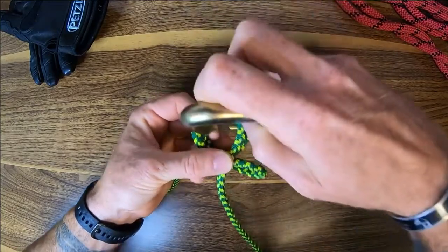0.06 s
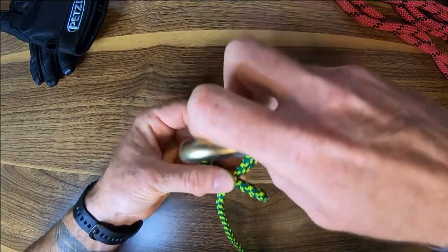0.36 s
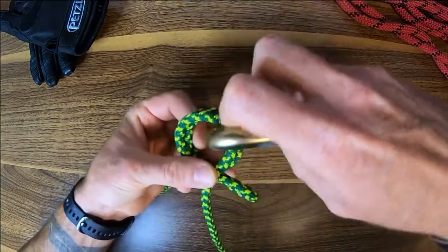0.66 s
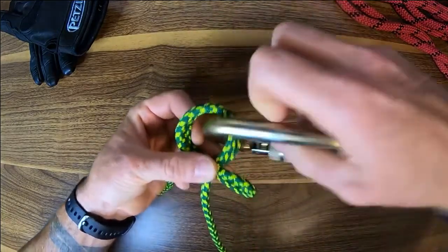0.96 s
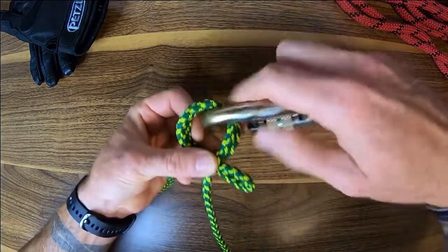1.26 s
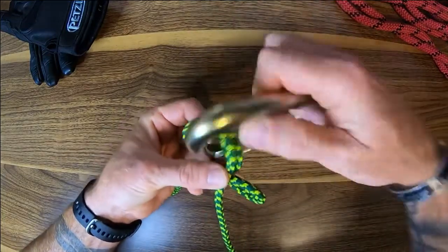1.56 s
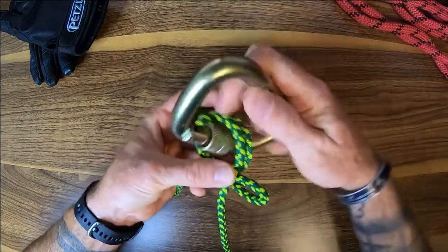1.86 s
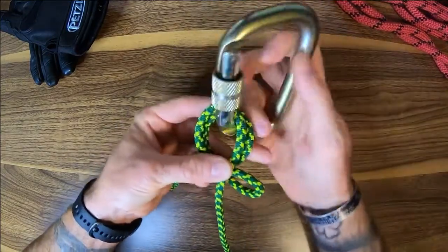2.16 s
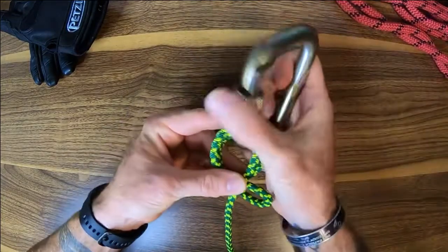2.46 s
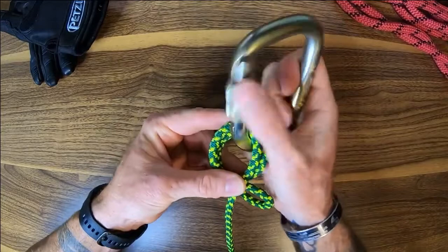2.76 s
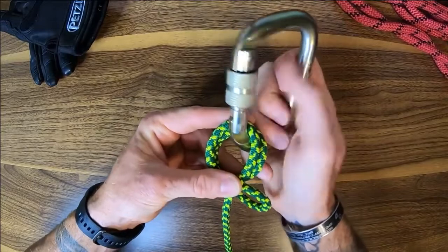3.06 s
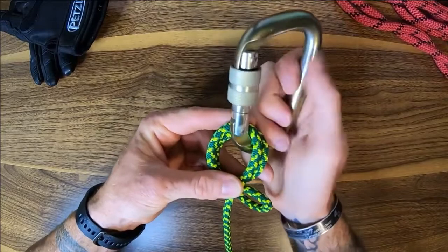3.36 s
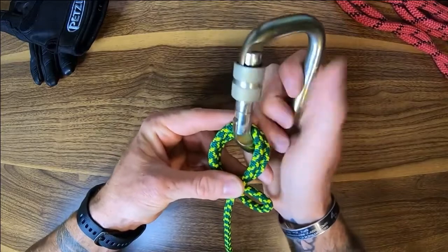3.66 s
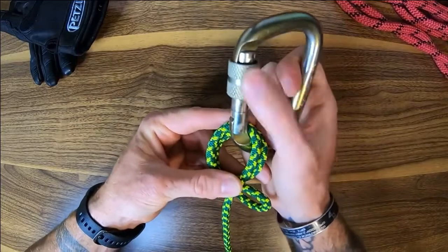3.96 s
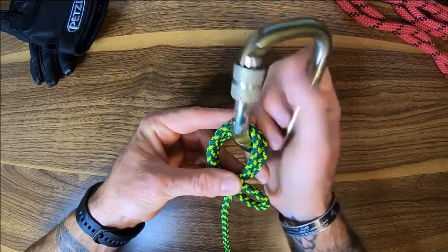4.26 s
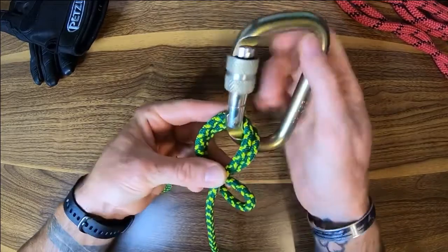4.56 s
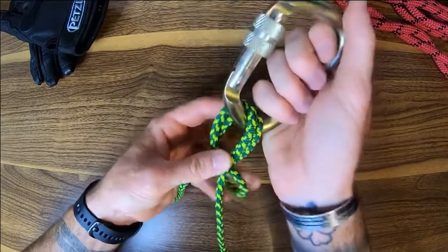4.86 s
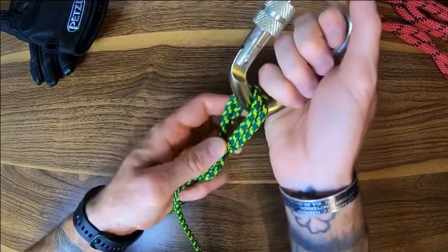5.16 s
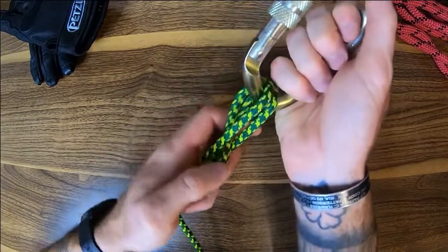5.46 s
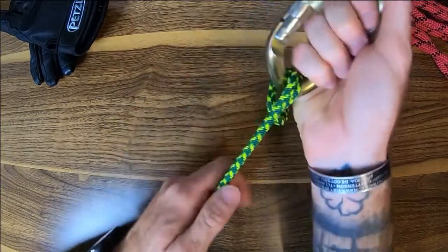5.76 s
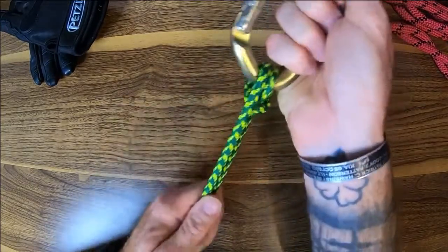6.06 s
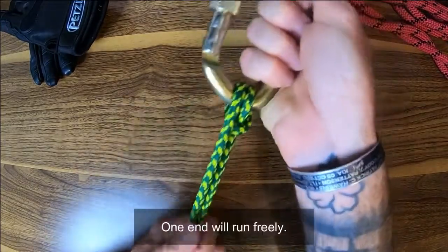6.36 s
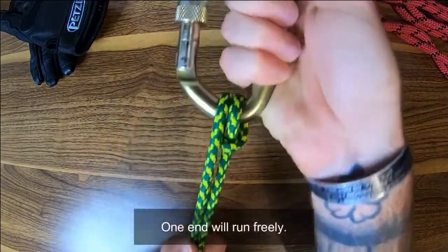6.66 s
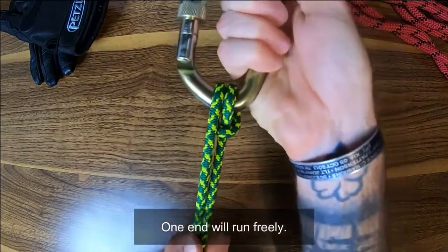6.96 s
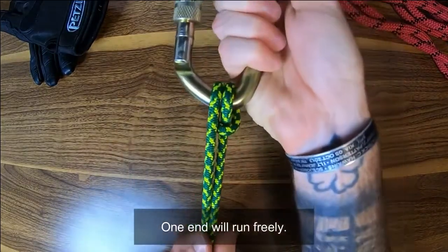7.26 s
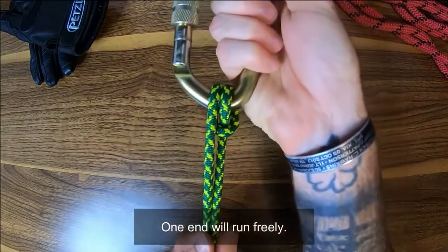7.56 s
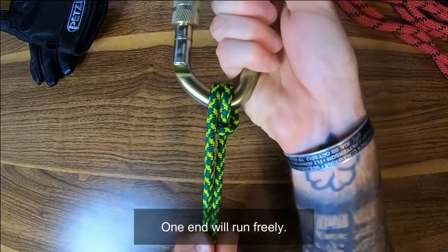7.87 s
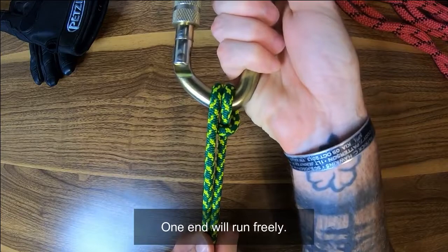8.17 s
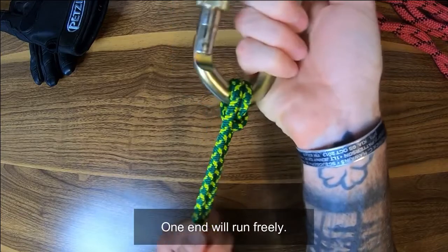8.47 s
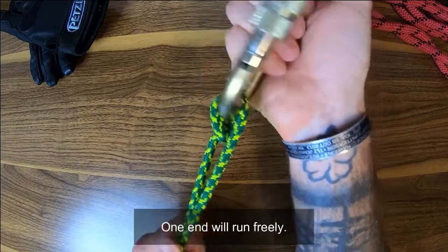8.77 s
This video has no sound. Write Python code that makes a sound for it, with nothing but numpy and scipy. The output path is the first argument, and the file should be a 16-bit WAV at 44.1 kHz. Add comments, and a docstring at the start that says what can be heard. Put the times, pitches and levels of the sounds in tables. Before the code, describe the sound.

In a small room with a steady rush of ventilation and a slowly pulsing low hum, a loud metallic snap rings out as a carabiner closes. Quieter rasping and clicking follows as the locking sleeve turns on its thread. Then cord is drawn tight against the steel, rustling and creaking softly, with light ticks and a few dull hand bumps. All the handling is heard up close.

```python
"""A sharp steel snap, a few rattling strokes, then rustling, creaking cord, in a small humming room.
A carabiner is clipped into a cord loop above a wooden table. Its sprung gate slams shut and rings,
ducking the automatic gain; a thumb screws the loose locking sleeve home, scraping and knocking on
the thread; the braid sticks and slips as it is drawn tight. Hands bump softly, ventilation rumbles
and a motor beats slowly against the mains hum."""
import sys
import numpy as np
from scipy import signal
from scipy.fft import rfft, irfft, next_fast_len
from scipy.io import wavfile
from scipy.ndimage import uniform_filter1d, minimum_filter1d

SR = 44100
rng = np.random.default_rng(int(sys.argv[2]) if len(sys.argv) > 2 else 0)


def inscribe(sig):
    """Save sig as 16-bit PCM at rate SR to the path in sys.argv[1].

    A 1-D sig is mono; a 2-D sig holds one channel per row.
    Samples are clipped to [-1, 1] before scaling.
    """
    pcm = np.round(np.clip(np.atleast_2d(sig).T, -1, 1) * 32767)
    wavfile.write(sys.argv[1], SR, pcm.astype(np.int16))


N = 392490
TIME = np.arange(N) / SR
SNAP_S = .9670   # the gate slams home

# colour of steel rubbing steel: f/Hz, relative level/dB
STEEL_RASP = [(600, -49), (1200, -10.5), (2000, -3), (2600, -0.5), (3600, 1), (4400, -4.5), (5300, 0),
              (7000, -1), (8700, -13.5), (10400, -17.5), (11500, -30), (14000, -26)]
# colour of sliding braid: f/Hz, relative level/dB
BRAID_HISS = [(120, 11.5), (280, 13), (600, 0.5), (1200, 1), (2500, 5.5), (4000, 2.5), (6000, -0.5),
              (7600, -2), (8500, -3), (10500, -13), (14000, -30)]


def gate(level_db=9, slam_db=3.5, crack_db=-16, crack_t60=0.064, clack_growth=0.36):
    """Steel hits steel: a dry clack, and a crack and bright ring that fill the room."""
    # gate and frame modes, the five that clack first: f/Hz, relative level/dB, t60/s, left over right/dB
    gate_modes = [(1470, -11.5, 0.0062, 2), (1870, -8, 0.0035, 3.5), (2863, 1.5, 0.0032, 1),
                  (3400, -2.5, 0.0058, 1.5), (3800, -1.5, 0.004, 1), (4868, -14, .007, 2),
                  (5170, -13, .008, 1.5), (7993, -2, 0.008, -10), (8700, -14.5, 0.0046, -6),
                  (10200, -20, .004, 5.5), (10900, -16.5, 0.004, 6.5)]
    # the closing gate grazes the nose, harder each time: t/s, relative level/dB
    grazes = [(.9254, -61), (.9458, -46.5), (0.9565, -31.5), (0.965, -23)]
    # colour of the crack: f/Hz, relative level/dB
    colour = [(900, -8.0), (1700, 4), (3200, 3), (6000, 5), (10500, -1.5), (14000, -4.0)]
    # faint chatter after the slam, ever sparser and softer: t/s, relative level/dB
    chatter = [(SNAP_S + .0024 * (k + 1) ** 1.2, -16 - 2 * k) for k in range(4)]
    t = TIME[:SR // 10]
    modes = [(-1) ** k * pan(left_db) * from_db(db - 60 * t / t60) * np.sin(2 * np.pi * hz * t)
             for k, (hz, db, t60, left_db) in enumerate(gate_modes)]
    clack, ring = sum(modes[:5]), sum(modes[5:])
    clacks, rings = np.zeros((2, 2, N))
    for s, db in grazes + [(SNAP_S, slam_db)] + chatter:
        crack = pan(left_db=4) * stereo_noise(colour, size=len(t)) * from_db(-60 * t / crack_t60)
        add(rings, s, from_db(db + level_db) * (ring + from_db(crack_db) * crack))
        # light touches ring more than they clack
        add(clacks, s, from_db(db + level_db + clack_growth * db) * clack)
    out = room(clacks, wet_db=-8.5, build_s=0.0043) + room(rings, wet_db=-2.5, build_s=0.007)
    # the snap's ring carries no deep bass
    return signal.sosfilt(signal.butter(2, 1300, "high", fs=SR, output="sos"), out + 1e-18)


def jolt(sway_db=-11, sway_hz=36, sway_t60=0.092, sway_delay_s=0.0051):
    """The snap jolts hand and frame: a short, low push and a slower sway."""
    # the push, left channel then right: delay/s, f/Hz, level/dB, t60/s
    pushes = [(.0038, 110, 5, .024), (.003, 170, 2, 0.019)]
    out, t = np.zeros((2, N)), TIME[:SR // 4]
    for channel, (delay_s, hz, db, t60) in zip(out, pushes):
        add(channel, SNAP_S + delay_s, from_db(db - 60 * t / t60) * np.sin(2 * np.pi * hz * t))
    sway = from_db(sway_db - 60 * t / sway_t60) * np.sin(2 * np.pi * sway_hz * t)
    add(out, SNAP_S + sway_delay_s, -pan(left_db=8) * sway)
    return out * [[-1], [1]]   # meets the two microphones with opposite signs


def sleeve(knock_db=-12.5, scrape_db=-3.5, sheen_db=6.5):
    """Knocks and fine scrapes of the thread set the locking sleeve and frame ringing."""
    # hardest knocks on the thread: t/s, relative level/dB, treble/dB, t60/s, favoured f/Hz
    knocks = [(2.567, -36, -12, .019, 3030), (2.582, -38, -9, .019, 3000), (2.6355, -42, -6, 0.047, 3190),
              (2.665, -32, 15, 0.018, 8420), (2.741, -32, 8, 0.015, 5200), (2.747, -26, 3, 0.015, 6340),
              (2.8448, -25.5, -4, .013, 2370), (3.0416, -20, 6.5, 0.016, 4430),
              (3.082, -35, -2.5, 0.017, 2930), (3.1115, -34, -2, .015, 5250),
              (3.1256, -32, 6.5, .019, 5230), (3.1363, -30, 8, 0.028, 6750),
              (3.1445, -31.5, 11, .016, 5100), (3.168, -35, 2, .022, 6720), (3.18, -35.5, 1, 0.022, 5190),
              (3.3202, -23, 6.5, 0.016, 5100), (3.3648, -25, 4.5, 0.027, 3560), (3.398, -40, 3, .05, 3400),
              (3.478, -38.5, 4, 0.032, 3190), (3.494, -42, 5, 0.017, 5300), (3.583, -53, -4, 0.024, 3200),
              (3.639, -35, 6, 0.052, 5200), (3.728, -41, -1, 0.018, 8500), (3.916, -32.5, 2.5, 0.066, 2610),
              (3.929, -28.5, -5, 0.021, 6800)]
    # thumb strokes: start/s, rise/s, length/s, relative level/dB, fade/dB, treble/dB, favoured f/Hz
    strokes = [(2.533, .046, 0.087, -41.5, 7, -16, 3000), (2.593, 0.041, 0.19, -43.5, 6, -5.5, 5900),
               (2.811, 0.018, 0.036, -39.5, 0, -7, 2600), (3.059, 0.05, .2, -39.5, 14, -3, 5030),
               (3.37, 0.011, .14, -43.5, 6.5, -0.5, 3840), (3.593, .04, .1, -36, 7.5, -7, 3680),
               (3.682, 0.028, .11, -43.5, 6.5, -25, 5300), (3.832, 0.022, .089, -40, -4, -8.5, 5370),
               (4.058, .019, 0.04, -57, -4.5, -3, 3000)]
    out, t = np.zeros((2, N)), TIME[:SR // 4]
    for s, db, treble_db, t60, hz in knocks:
        knock = contact(stereo_noise(STEEL_RASP, size=SR // 12), t60, treble_db)
        add(out, s, from_db(db + knock_db) * steel_ring(knock, hz))
    for s, rise_s, length_s, db, fade_db, treble_db, hz in strokes:
        pressure = thumb_pressure(t, rise_s, length_s, fade_db)
        roughness = stick_slip(per_s=450, spread_db=3.2, size=len(t))
        dull, bright = split_bands(roughness * stereo_noise(STEEL_RASP, size=len(t)))
        scrape = from_db(scrape_db) * pressure * (dull + from_db(treble_db) * bright)
        rattle = from_db(knock_db) * rattles(pressure, treble_db)
        add(out, s, from_db(db) * steel_ring(scrape + rattle, hz))
    left, right = pan(left_db=0.5) * out
    # the right microphone favours the top of the rasp
    sheen = from_db(sheen_db) * resonate(right, hz=8530, width_hz=370)
    return np.array([left, right + sheen])


def thumb_pressure(t, rise_s, length_s, fade_db, release_s=0.011):
    """The thumb bears on, eases off as it rolls (a negative fade presses harder) and lets go."""
    bearing_on = np.clip(t / rise_s, 0, 1) ** 2
    easing = from_db(-fade_db * np.clip((t - rise_s) / (length_s - rise_s), 0, 1))
    letting_go = np.clip((length_s - t) / release_s, 0, 1)
    return bearing_on * easing * letting_go


def rattles(pressure, treble_db, per_s=70, relative_db=-4.5, spread_db=4.5, t60=0.015):
    """The loose sleeve rattles as it turns: small random knocks that follow the thumb's pressure."""
    out = np.zeros((2, N))
    for k, (jitter, strength) in enumerate(rng.standard_normal((14, 2))):
        s = (k + .5 + .5 * np.tanh(jitter)) / per_s
        knock = contact(stereo_noise(STEEL_RASP, size=SR // 25), t60, treble_db)
        force = np.interp(s, TIME[:len(pressure)], pressure)
        add(out, s, force * from_db(relative_db + spread_db * strength) * knock)
    return out[:, :len(pressure)]


def steel_ring(drive, favoured_hz, favour_db=1, grip_db=4.5, retune=0.0091, ring_db=0.5, rasp_db=-5.0):
    """Sleeve and frame ring; each new grip favours one pitch and nudges the modes' tuning and level."""
    # modes of the sleeve on the frame: f/Hz, width/Hz, relative level/dB
    modes = [(2590, 50, 0), (3000, 70, -1), (3280, 50, -3), (3580, 150, -1), (3710, 150, 2),
             (4640, 160, -10), (5230, 170, .5), (5450, 110, -3), (5750, 45, 0), (5980, 110, -1),
             (6350, 160, -4), (6720, 110, 0), (7200, 80, -5), (7680, 130, -6), (8600, 300, -4),
             (9200, 260, -3), (9950, 400, 0)]
    drive = drive + from_db(favour_db) * resonate(drive, favoured_hz, width_hz=390)
    grips = rng.standard_normal((len(modes), 2))
    ringing = sum(from_db(db + grip_db * freedom) * resonate(drive, hz * (1 + retune * shift), width)
                  for (hz, width, db), (freedom, shift) in zip(modes, grips))
    return from_db(rasp_db) * drive + from_db(ring_db) * ringing


def cord_rustle(pull_db=6.0, rub_db=3):
    """The braid hisses, louder the faster it slides, grainy as its fibres catch."""
    # hiss as the cord is dressed, then pulled tight: t/s, relative level/dB
    pull_curve = [(4.33, -80), (4.37, -85), (4.4, -71), (4.62, -77.5), (4.73, -70.5), (5.18, -80),
                  (5.24, -95), (5.28, -74), (5.32, -84.5), (5.665, -72.5), (5.7, -64.5), (5.78, -62.5),
                  (5.9, -69.5), (5.99, -63), (6.06, -66), (6.14, -73.5), (6.69, -66), (6.8, -83.5),
                  (7.06, -72), (7.2, -103)]
    # brief rubs between the fingers: centre/s, relative level/dB, half length/s
    rubs = [(.66, -67.5, 0.042), (1.7, -63, 0.015), (2.27, -68.5, 0.05), (8.2, -72, 0.023),
            (8.46, -75, 0.028), (8.8, -76, 0.18)]
    times, levels = np.transpose(pull_curve)
    pulling = from_db(pull_db + np.interp(TIME, times, levels, left=-np.inf, right=-np.inf))
    rubbing = from_db(rub_db) * sum(from_db(db) * swell(s, half_s) for s, db, half_s in rubs)
    fibres = stick_slip(per_s=350, spread_db=2.1)
    return (pulling + rubbing) * fibres * stereo_noise(BRAID_HISS)


def cord_creaks():
    """The loaded braid slips on the steel in small jerks that make the taut cord resonate."""
    # creaks: centre/s, level/dB, half length/s, f/Hz, width/Hz
    creaks = [(.652, -64, .043, 3030, 1100), (2.35, -68, .04, 2720, 160), (2.38, -67, .07, 3130, 300),
              (2.5, -67, .06, 2900, 1100), (5.837, -69, .1, 3100, 1600), (6.3, -69.5, .14, 2600, 1200),
              (6.583, -69, .1, 3500, 1500), (7.68, -76, .1, 3750, 600), (8.46, -68.5, .038, 3300, 700),
              (8.65, -72, .04, 3400, 600), (8.77, -64, .035, 2450, 450)]
    jerks = stick_slip(per_s=200, spread_db=3.6) * stereo_noise(BRAID_HISS)
    return sum(from_db(db) * swell(s, half_s) * rms_one(band(jerks, hz, width))
               for s, db, half_s, hz, width in creaks)


def cord_ticks(level_db=-13.0, t60=0.024):
    """Cord and fingers tick lightly on the frame, and the loaded braid slips on it in single clicks."""
    # touches and single slips of the braid: t/s, relative level/dB, treble/dB
    ticks = [(0.529, -51, 1.5), (1.6811, -52, 6), (1.8387, -54, 4), (2.3084, -52.5, 6), (4.291, -49, -1),
             (6.355, -50, -2), (6.5018, -46, 0), (6.677, -46, 9), (7.5012, -54, -5), (7.6065, -50, -10),
             (7.643, -49, -10), (7.6764, -52, -11.5), (7.703, -52, -10), (8.1225, -50.5, -4),
             (8.172, -51.5, 2), (8.413, -42.5, -9), (8.48, -56.5, 1), (8.631, -52.5, -11.5),
             (8.7483, -53, -14.5)]
    # colour of a tick: f/Hz, relative level/dB
    colour = [(1000, 1), (2200, -5), (3200, 1.5), (4000, -4), (4800, -12.5), (8000, -11), (11000, -28),
              (14000, -44)]
    out = np.zeros((2, N))
    for s, db, treble_db in ticks:
        tick = contact(stereo_noise(colour, size=SR // 20), t60, treble_db)
        add(out, s, from_db(db + level_db) * tick)
    return out


def hand_bumps(width_share=0.33):
    """Soft, dull knocks of the hands: short swells of low noise."""
    # bumps: centre/s, level/dB, half length/s, f/Hz
    bumps = [(2.552, -41, 0.038, 57), (3.402, -48, 0.057, 131.4), (4.48, -39, 0.021, 141),
             (6.215, -47, .12, 142.6), (6.894, -43.5, 0.043, 133.6), (6.896, -40, 0.049, 57.3),
             (7.312, -50, .031, 35.95), (7.458, -54, 0.03, 36)]
    noise, out = rng.standard_normal(N), 0
    for s, db, half_s, hz in bumps:
        shape = swell(s, half_s)
        rumble = shape * band(noise, hz, hz * width_share)
        out = out + from_db(db) * rms_one(rumble) * np.sqrt(np.mean(shape ** 2))
    return out


def ventilation(air_db=-49.5):
    """Moving air: a broad wash, droning room resonances and a rumble around the hum."""
    # colour of the air: f/Hz, relative level/dB
    colour = [(20, -16), (45, -18), (80, -9), (100, -8), (135, 2.5), (220, -1), (330, -6), (500, -9),
              (680, -9.5), (860, -14.5), (980, -15.5), (1400, -19), (2000, -24.5), (5000, -41.5),
              (9000, -49.5), (13000, -66.5)]
    # room resonances, then the rumble: f/Hz, width/Hz, rms level/dB
    drones = [(119.1, 7.5, -55), (132.8, 4.2, -54.5), (143.2, 14, -54), (203.9, 42, -56.5),
              (294.5, 8.8, -64.5), (368.8, 15, -63.5), (513, 15, -80.5), (632, 91, -60), (689, 9.8, -68),
              (743.8, 23, -66), (856.2, 49, -66)]
    rumble = (62.73, 84, -62)
    out = from_db(air_db) * stereo_noise(colour)
    for hz, width, db in drones + [rumble]:
        out = out + from_db(db) * rms_one(band(rng.standard_normal(N), hz, width))
    return out


def hum(crest_s=.81):
    """A motor running just under mains frequency beats slowly with the mains hum."""
    # motor, then mains: f/Hz, rms level/dB
    tones = [(58.83, -53.5), (59.98, -56.5)]
    return sum(np.sqrt(2) * from_db(db) * np.cos(2 * np.pi * hz * (TIME - crest_s)) for hz, db in tones)


def room(x, wet_db, build_s=0.0021, dull_t60=.33, bright_t60=.26):
    """Diffuse reflections build up quickly and die away, the treble first."""
    # colour of the reflections: f/Hz, relative level/dB
    colour = [(150, -7.0), (1000, -6.5), (1800, -4.5), (3400, -5), (5000, -2), (8000, 1.0),
              (10700, 3.5), (14000, 2)]
    t = TIME[:SR // 2]
    dull, bright = split_bands(stereo_noise(colour, size=len(t)))
    tail = dull * from_db(-60 * t / dull_t60) + bright * from_db(-60 * t / bright_t60)
    build_up = 1 - np.exp(-(t / build_s) ** 2)
    tail = rms_one(tail * build_up) / np.sqrt(len(t))
    return x + from_db(wet_db) * signal.oaconvolve(x.mean(axis=0)[None], tail, axes=1)[:, :N]


def contact(noise, t60, treble_db, rise_s=0.001, edge_hz=4400):
    """One contact: a tiny burst of chatter, brighter for a harder hit."""
    t = TIME[:noise.shape[1]]
    dull = signal.sosfiltfilt(signal.butter(3, edge_hz, fs=SR, output="sos"), noise)
    chatter = dull + (noise - dull) * from_db(treble_db)
    envelope = (1 - np.exp(-(t / rise_s) ** 2)) * from_db(-60 * t / t60)
    return rms_one(chatter * envelope) * np.sqrt(t60 / t[-1])


def stick_slip(per_s, spread_db, size=N):
    """Uneven friction: a gain that jumps about at a given rate."""
    steps = rng.standard_normal(size)
    wander = np.interp(TIME[:size] * per_s, np.arange(size), steps)
    return rms_one(from_db(spread_db * np.clip(wander, -2, 2)))


def stereo_noise(colour, size=N):
    """Diffuse coloured noise, most alike in both channels in the bass; rms 1."""
    # likeness of left and right: f/Hz, correlation
    likeness = [(60, 0.47), (130, 0.99), (280, 0.93), (620, 0.55), (1350, 0), (2950, 0.72), (6400, 0.24),
                (14000, 0.0076)]
    padded = next_fast_len(size, True)
    hz = np.maximum(np.fft.rfftfreq(padded, 1 / SR), 1)
    mid, side = rfft(rng.standard_normal((2, padded)))
    alike = np.clip(at_hz(likeness, hz), -1, 1)
    both = np.sqrt(1 + alike) * mid + np.sqrt(1 - alike) * side * [[1], [-1]]
    return rms_one(irfft(both * from_db(at_hz(colour, hz)), padded)[:, :size])


def resonate(x, hz, width_hz):
    """A resonance with gain 1 at its peak."""
    r = np.exp(-np.pi * width_hz / SR)
    feedback = [1, -2 * r * np.cos(2 * np.pi * hz / SR), r * r]
    return signal.lfilter(np.array([1, 0, -1]) * (1 - r * r) / 2, feedback, x + 1e-18)


def band(x, hz, width_hz):
    """The same resonance twice over, for steeper skirts."""
    return resonate(resonate(x, hz, width_hz), hz, width_hz)


def split_bands(x, edge_hz=3300):
    """The dull and the bright part of a sound."""
    dull = signal.sosfilt(signal.butter(1, edge_hz, fs=SR, output="sos"), x)
    return dull, x - dull


def swell(s, half_s):
    """A bell-shaped rise and fall."""
    out = np.zeros(N)
    near = slice(*np.searchsorted(TIME, [s - 10 * half_s, s + 10 * half_s]))
    out[near] = np.exp(-.5 * ((TIME[near] - s) / half_s) ** 2)
    return out


def from_db(db):
    """Decibels to gain."""
    return 10 ** (np.asarray(db) / 20)


def rms_one(x):
    """Scale to rms 1."""
    return x / np.sqrt(np.mean(x ** 2) + 1e-20)


def at_hz(points, hz):
    """Read a curve along log frequency."""
    freqs, values = np.transpose(points)
    return np.interp(np.log(hz), np.log(freqs), values)


def pan(left_db):
    """Channel gains that put the left this far above the right."""
    return from_db(np.array([[left_db], [-left_db]]) / 2)


def add(out, s, sound):
    """Mix a sound in at s seconds."""
    at = int(round(s * SR))
    out[..., at:at + sound.shape[-1]] += sound[..., :N - at]


def release(over_db, db_per_s):
    """Gain reduction that is let go at a steady rate."""
    return np.maximum.accumulate(over_db + db_per_s * TIME) - db_per_s * TIME


def scene(lean_db=-15):
    """Hardware and cord up close, their upper treble leaning right; the room behind."""
    hardware = gate() + room(sleeve(), wet_db=-6.0)
    cord = room(cord_rustle() + cord_creaks() + cord_ticks(), wet_db=-1.0)
    near = hardware + cord
    lean = from_db(lean_db) * resonate(near, hz=7200, width_hz=5100) * [[-1], [1]]
    return near + lean + jolt() + hand_bumps() + ventilation() + hum()


def record(dry, threshold_db=-4.0, slow_share=0.31, attack_s=0.0032, cutoff_hz=13900):
    """The gain ducks on a loud peak and recovers fast, then slowly; a limiter and a high cut follow."""
    peak_db = 20 * np.log10(np.abs(dry).max(axis=0) + 1e-9)
    over_db = np.maximum(peak_db - threshold_db, 0)
    duck_db = np.maximum(release(over_db, db_per_s=99), release(slow_share * over_db, db_per_s=7.0))
    r = np.exp(-1 / (attack_s * SR))
    levelled = dry * from_db(-signal.lfilter([1 - r], [1, -r], duck_db))
    headroom = 1 / np.maximum(np.abs(levelled).max(axis=0), 1)
    limited = levelled * uniform_filter1d(minimum_filter1d(headroom, size=32), size=32)
    return signal.sosfilt(signal.ellip(12, .1, 100, cutoff_hz, fs=SR, output="sos"), limited)


dry = scene()
out = record(dry)
inscribe(out)
```